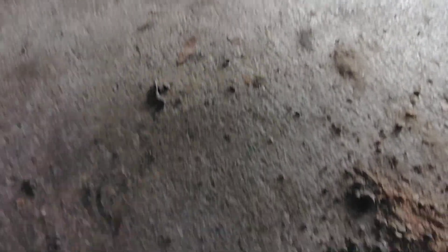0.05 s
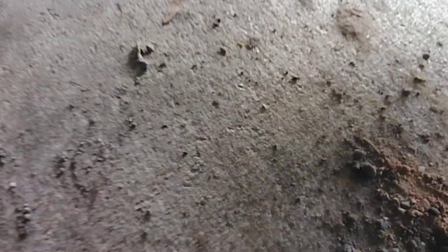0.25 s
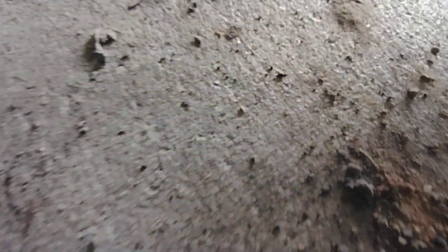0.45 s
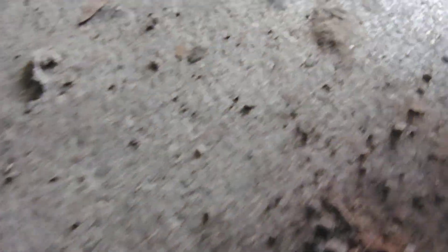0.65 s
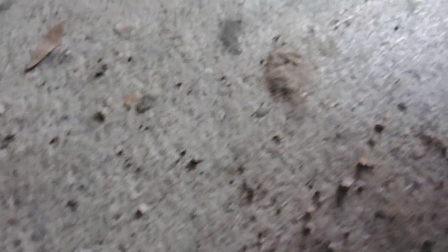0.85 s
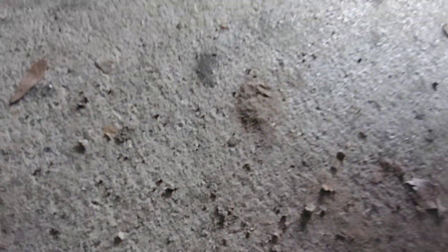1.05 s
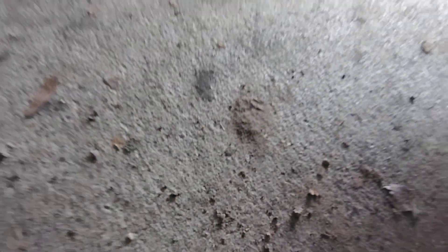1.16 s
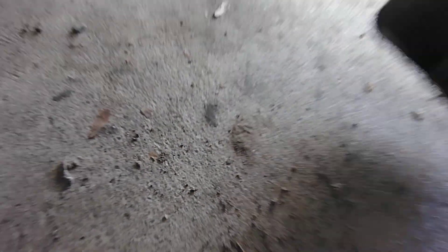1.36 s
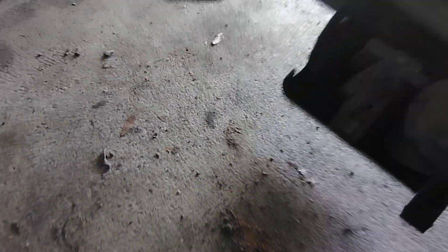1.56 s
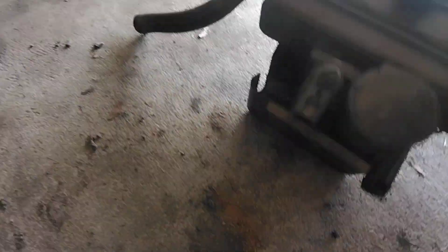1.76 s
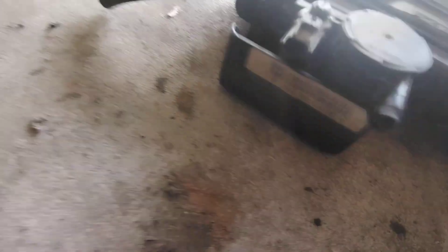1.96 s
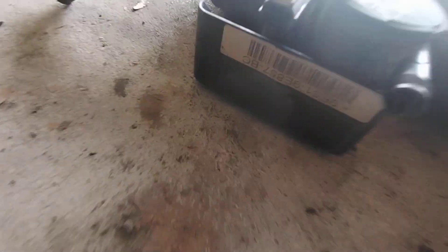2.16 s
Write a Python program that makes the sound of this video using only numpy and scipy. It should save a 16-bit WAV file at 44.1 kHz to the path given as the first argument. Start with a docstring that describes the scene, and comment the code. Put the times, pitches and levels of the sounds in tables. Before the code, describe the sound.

Two loud, hard knocks of a hollow plastic car part on concrete, close to the microphone. Until about 1.8 s there is only quiet low rumble, a faint hollow moan and a thin wavering whine. At 1.82 s comes a bright, gritty clack with brief ringing; at 2.10 s a duller, heavier knock, then quick rattling and scraping to 2.2 s, with a short garage echo.

```python
"""A garage with a concrete floor: a hollow plastic car part is knocked on it twice, close to the microphone.
Before and under the knocks runs a low rumble of shaped noise, with a faint hollow moan and a sine whine.
Each knock is a cluster of contacts: decaying sines ring the shell and the base pocks and sags in pitch.
Short noise bursts thump, snap the rim and crack grit, and resonators let the rim ring on.
The part then rocks and scrapes in a spray of tiny slips, and the garage answers with a brief noise tail."""
import sys
import numpy as np
from scipy import signal
from scipy.fft import rfft, irfft
from scipy.io import wavfile
from scipy.ndimage import uniform_filter1d

SR = 44100
rng = np.random.default_rng(int(sys.argv[2]) if len(sys.argv) > 2 else 0)


def dump_mix(stems):
    """Bounce the given channels to the path in sys.argv[1] as a 16-bit WAV at rate SR."""
    frames = np.atleast_2d(stems).T  # one column per channel
    limited = np.clip(frames, -1, 1)  # hard clip at full scale
    pcm = np.round(limited * 32767).astype(np.int16)
    wavfile.write(sys.argv[1], SR, pcm)


N = 96843
TIME = np.arange(N) / SR
BURST_ALIKE = 0.89  # left-right likeness of the contact noises, 0-1


def amp(db):
    """Decibels to gain."""
    return 10 ** (np.asarray(db) / 20)


def unit(x):
    """Scales to rms 1."""
    return x / np.sqrt(np.mean(x ** 2) + 1e-20)


def at_hz(points, hz):
    """Reads a table on a log-frequency axis."""
    f, value = np.transpose(points)
    return np.interp(np.log(hz + 1), np.log(f + 1), value)


def at_time(points, t):
    """Reads a curve in time."""
    return np.interp(t, *np.transpose(points))


def add(mix, s, sound):
    """Mixes a stereo sound in at time s, cut off at the end of the mix."""
    part = mix[:, round(s * SR):][:, :sound.shape[1]]
    part += sound[:, :part.shape[1]]


def colour(x, points):
    """Gives a signal the spectral balance of a table."""
    hz = np.fft.rfftfreq(x.shape[-1], 1 / SR)
    return irfft(rfft(x) * amp(at_hz(points, hz)), x.shape[-1])


def pair(z, alike):
    """Makes two unrelated channels partly alike."""
    c = np.clip(alike, -1, 1)
    return np.array([z[0], c * z[0] + np.sqrt(1 - c ** 2) * z[1]])


def patches(shape, bins, frames):
    """Smooth random patches over frequency and time, rms 1."""
    noise = uniform_filter1d(rng.standard_normal(shape), size=bins, axis=0)
    return unit(uniform_filter1d(noise, size=frames, axis=1))


# spectrum of the rumble (f/Hz, relative level/dB per Hz)
RUMBLE_COLOUR = [(15, -47), (25, -13), (43, -5), (70, -15.5), (102, 2), (161, -4), (190, -2), (335, -14.5),
                 (394, -10), (427, -13), (714, -15), (936, -15.5), (1130, -20.5), (1740, -24.5),
                 (2610, -39.5), (4740, -50.5), (6920, -60), (13200, -58.5), (16000, -63.5)]
# left-right likeness of the rumble (f/Hz, likeness 0-1)
RUMBLE_LIKENESS = [(60, 0.98), (180, 0.9847), (550, 0.32), (1650, 0.27), (4970, 0.097), (15000, 0.3677)]
# swell of the bass (t/s, lift/dB)
BASS_LIFT = [(0, -1.5), (.45, 1.5), (.7, -2), (.87, 1), (.92, 9), (.98, 0.5), (1.2, -0.5), (1.65, -1),
             (2.2, 0)]
# swell of the middle (t/s, lift/dB)
MID_LIFT = [(0, -0.5), (.18, 1.5), (.42, -2.5), (.9, -3.5), (1.35, -3), (1.65, -1), (2.2, -3)]
# faint hollow tone in the rumble (t/s, lift/dB)
MOAN_LIFT = [(0, -1), (.07, -1), (.14, 8), (.2, -2), (2.2, 5.5)]


def rumble(level_db=-39.5, patch_db=1.5, bass_hz=220, mid_hz=1500, moan_hz=1000, moan_width_hz=110):
    """Low noise with moving bass and middle; a narrow band lifts out of it as a moan."""
    noise = rng.standard_normal((2, N))
    hz, t, z = signal.stft(noise, SR, nperseg=2048, noverlap=1536)
    f = hz[:, None]
    bass = at_time(BASS_LIFT, t) / (1 + (f / bass_hz) ** 4)
    middle = at_time(MID_LIFT, t) * np.exp(-2 * np.log((f + 1) / mid_hz) ** 2)
    moan = at_time(MOAN_LIFT, t) * np.exp(-((f - moan_hz) / moan_width_hz) ** 2)
    flicker = patch_db * patches(z.shape[1:], 8, 10)
    level = at_hz(RUMBLE_COLOUR, f) + bass + middle + moan + flicker
    z = pair(z, at_hz(RUMBLE_LIKENESS, f)) * amp(level)
    sound = signal.istft(z, SR, nperseg=2048, noverlap=1536)[1][:, :N]
    low_cut = signal.butter(4, 35, "high", fs=SR, output="sos")  # Hz
    return amp(level_db) * unit(signal.sosfilt(low_cut, sound))


# loudness of the whine (t/s, rms level/dB)
WHINE_LEVEL = [(0, -63), (.55, -71), (.8, -60), (.95, -65), (1.12, -56.5), (1.2, -58), (1.36, -55),
               (1.5, -62.5), (1.65, -62.5), (2.2, -67)]


def whine(centre_hz=920, waver_share=0.0032):
    """A thin sine whose pitch wavers slightly at random, the same in both channels."""
    waver = unit(uniform_filter1d(rng.standard_normal(N), size=2000))
    hz = centre_hz * (1 + waver_share * waver)
    return amp(at_time(WHINE_LEVEL, TIME)) * unit(np.sin(2 * np.pi * np.cumsum(hz) / SR))


# modes of the hollow shell (f/Hz, relative level/dB, t60/s when ringing free)
SHELL_MODES = [(159.2, -31.5, .12), (353, -32, 0.04), (443, -24, 0.11), (663, -10, .13), (811, -7, 0.069),
               (975, -3, 0.075), (1099.6, -10.5, .15), (1290, 1, 0.074), (1353, -5.5, 0.097),
               (1640, -36, .06), (1775, -12.5, .09), (2045, -5.5, 0.079), (2340, -30, 0.079),
               (3420, -42, .1)]


def shell(ring, tilt_db, t, rise_s=0.00074, pivot_hz=1200, stagger_rad=0.9):
    """The hollow body rings: brighter after a hard contact, more briefly when pressed against the floor."""
    modes = np.zeros(len(t))
    for k, (hz, db, t60) in enumerate(SHELL_MODES):
        tilted_db = db + tilt_db * np.log2(hz / pivot_hz)
        decay_db = -60 * t / (t60 * max(ring, .05))
        # the modes start out of step with each other
        modes += amp(tilted_db + decay_db) * np.sin(2 * np.pi * hz * t + stagger_rad * k ** 2)
    return modes * (1 - np.exp(-t / rise_s))


def panel(t, peak_hz=1312, peak_s=0.00187, sag=0.26):
    """The base flexes for a few cycles and is stopped by the floor: a dead pock that sags in pitch."""
    u = t / peak_s  # 1 at the loudest moment
    hz = peak_hz * (1 - sag * np.tanh(u - 1))
    return (u * np.exp(1 - u)) ** 2 * np.sin(2 * np.pi * np.cumsum(hz) / SR)


def burst(points, t60, t, attack_s=0.00044):
    """Dense, heavily damped vibration: a fast rise and a short decay with a set energy."""
    envelope = (1 - np.exp(-t / attack_s)) * amp(-60 * t / t60)
    noise = pair(rng.standard_normal((2, len(t))), BURST_ALIKE)
    return unit(envelope * colour(noise, points)) * np.sqrt(np.mean(envelope ** 2))


# spectrum of the thump (f/Hz, relative level/dB per Hz)
THUMP_COLOUR = [(25, -45), (45, -24), (70, -7.5), (130, 1.5), (260, -11), (400, -5), (520, -8), (1500, -12),
                (4000, -74)]


def thump(t):
    """The low, damped blow of a contact, in one channel."""
    return burst(THUMP_COLOUR, 0.041, t)[0]


# spectrum of the rim snap (f/Hz, relative level/dB per Hz)
SNAP_COLOUR = [(300, -25), (1200, -10.5), (2150, -0.5), (2800, -3), (3500, -4), (4250, -2), (5200, -30),
               (5900, -30), (6700, -15.5), (8500, -35), (16000, -48.5)]


def snap(t):
    """The rim snaps: a short burst centred on the upper middle."""
    return burst(SNAP_COLOUR, 0.018, t)


# spectrum of the grit (f/Hz, relative level/dB per Hz)
GRIT_COLOUR = [(800, 6.5), (3000, 8), (4300, -5.5), (5200, -2.5), (6300, -4), (7600, -14), (8400, -11),
               (9400, -2.5), (11200, 1.5), (12300, 1), (13500, -1), (15500, -2)]


def grit(t):
    """Grit cracks under the part: the shortest and brightest burst."""
    return burst(GRIT_COLOUR, 0.014, t)


# resonances of the stiff rim (f/Hz, level/dB against the direct sound, width/Hz)
RIM_MODES = [(3420, -10.5, 320), (3990, -4.5, 330), (6500, 3, 260), (7560, 6.5, 270), (9670, 2.5, 300),
             (10810, 10.5, 150), (13500, 5.5, 220), (15600, -3, 203.7)]


def rim(x, level_db=-2.5):
    """The stiff rim rings on at its own high resonances."""
    sound = x.copy()
    for hz, db, width in RIM_MODES:
        sound += amp(db) * signal.lfilter(*signal.iirpeak(hz, hz / width, fs=SR), x)
    return amp(level_db) * sound


# contacts with the floor (t/s, shell level/dB, share of free ring time 0-1, brightness/dB per octave,
# base panel level/dB, thump level/dB, rim snap level/dB, grit level/dB, L-R/dB of snap and grit);
# snap and grit as they enter the rim, all before the microphone ports
FLOOR_CONTACTS = [(1.791, -62, 0, -6.5, -67, -60, -48.5, -72, -3),
                  (1.817, -4.5, 0.74, -3, -26, -35, -20, -17, -1.5),
                  (1.8300, -24, 0.8, -9.5, -34, -16, -34, -42, 5.5),
                  (1.8325, -19.5, .6, 10, -37, -34, -18.5, -2.5, 0),
                  (1.8360, -14, 0.3, 12, -16, -27, -26, -24, 23),
                  (1.8580, -30, 0.9, 2, -44, -38, -31, -28, -19.5),
                  (1.9650, -35, 1., -6, -34, -50, -39.5, -47, -20),
                  (2.0482, -56, .12, -1.5, -27.5, -50, -62, -64, -7),
                  (2.0815, -45, 0.4, 2.5, -33, -49, -33, -31.5, -5),
                  (2.0984, -33, 0, 0, -19.5, -16, -6.5, -34, 0.5),
                  (2.1036, -8.5, 0.23, -8, 0.5, -11, -8, -25, 7.5),
                  (2.1202, -25, 0.12, 2, -34, -34, -19, -26, 1),
                  (2.1222, -28, 0.4, 8, -14, -30, -37, -44, 7),
                  (2.1275, -22.5, 0.6, -7, -24, -27, -24, -28, 4),
                  (2.1358, -28.5, 0.55, -10, -25, -21, -44.5, -48, 3),
                  (2.1582, -42, 0.02, -1, -14.5, -21, -47, -54, -5),
                  (2.1645, -34, 0.1, 2, -25, -24.5, -23, -21, 14.5),
                  (2.1732, -36, .4, -1, -22, -23, -24, -17, -6),
                  (2.1777, -23.5, 0.5, -7, -17, -33, -36, -36, 0),
                  (2.1832, -31, 0.37, -11.5, -16, -32, -24, -39, 4)]


def knocks():
    """Each contact rings the shell, flexes the base, thumps, snaps the rim and crushes grit."""
    body, edge = np.zeros((2, N)), np.zeros((2, N))
    t = np.arange(2 ** 13) / SR
    for s, shell_db, ring, tilt_db, panel_db, thump_db, snap_db, grit_db, pan_db in FLOOR_CONTACTS:
        hollow = amp(shell_db) * shell(ring, tilt_db, t) + amp(panel_db) * panel(t)
        add(body, s, hollow[None] + amp(thump_db) * thump(t))
        crack = amp(snap_db) * snap(t) + amp(grit_db) * grit(t)
        add(edge, s, crack * amp([[pan_db / 2], [-pan_db / 2]]))
    return body + rim(edge)


# loudness of the rim dragging on the concrete, before the ports (t/s, level/dB)
DRAG_LEVEL = [(1.82, -38), (1.85, -22.5), (1.92, -42), (1.97, -32), (2.04, -45.5), (2.085, -37),
              (2.12, -26), (2.15, -37), (2.18, -18), (2.2, -44)]
# spectrum of the drag (f/Hz, relative level/dB per Hz)
DRAG_SPECTRUM = [(25, -30), (70, -4), (200, -14), (500, -2.5), (700, 7), (1200, 6.5), (1900, -1.5),
                 (2800, -10.5), (3800, -8.5), (5300, -16.5), (7200, -11.5), (8600, -18.5), (10500, -16.5),
                 (16000, -36)]


def drag(slips_per_s=2000, spread_db=3, patch_db=4):
    """Tiny uneven slips on the rough concrete; their colour shifts as the point of contact moves."""
    sizes = amp(spread_db * np.minimum(rng.exponential(1, N), 4))
    slips = (rng.random(N) < slips_per_s / SR) * sizes
    signs = pair(rng.choice([-1, 1], (2, N)), BURST_ALIKE)
    z = signal.stft(colour(slips * signs, DRAG_SPECTRUM), nperseg=512)[2]
    z = z * amp(patch_db * patches(z.shape[1:], 3, 7))
    grains = signal.istft(z, nperseg=512)[1][:, :N]
    started = TIME > DRAG_LEVEL[0][0]
    return unit(grains) * amp(at_time(DRAG_LEVEL, TIME)) * started


# the two microphone ports: phase (f/Hz, radians by which left leads)
PORT_LEAD = [(0, 0.5), (500, -0.04), (1100, -0.67), (2200, -1.43), (4000, -1.56), (8000, -0.97),
             (16000, -1.76)]
# the two microphone ports: balance (f/Hz, L-R/dB)
PORT_SHADING = [(60, 0.65), (110, 0.61), (200, 0.282), (380, -0.5), (700, -1.2), (1290, -1.5), (2380, -3.2),
                (4400, 1.7), (8120, -0.22), (15000, 0.0)]


def ports(x):
    """The close sound reaches the two ports with different delay and shading."""
    hz = np.fft.rfftfreq(N, 1 / SR)
    half_db = at_hz(PORT_SHADING, hz) / 2
    left = amp(half_db) * np.exp(1j * at_hz(PORT_LEAD, hz))
    return irfft(rfft(x) * np.array([left, amp(-half_db)]), N)


# decay of the garage (f/Hz, t60/s)
GARAGE_DECAY = [(150, 0.04), (600, 0.23), (1400, 0.28), (3700, 0.94), (9000, 0.9), (16000, 0.55)]
# colour of the garage tail (f/Hz, relative level/dB)
GARAGE_TONE = [(100, -1), (500, 4), (1200, 0), (2200, -2), (4000, -3.5), (7000, -9.5), (15000, -6)]


def garage(x, level_db=-10, alike=0.46, first_echo_s=0.0027):
    """A short diffuse tail, each band dying at its own speed."""
    noise = pair(rng.standard_normal((2, SR // 2)), alike)
    hz, t, z = signal.stft(noise, SR, nperseg=256)
    z = z * amp(-60 * t / at_hz(GARAGE_DECAY, hz)[:, None])
    tail = signal.istft(z, SR, nperseg=256)[1]
    tail = colour(tail / np.linalg.norm(tail[0]), GARAGE_TONE)
    # silent up to the first echo, then fading in over the same time again
    tail = tail * np.clip(np.arange(tail.shape[1]) / SR / first_echo_s - 1, 0, 1)
    return amp(level_db) * signal.fftconvolve(x.mean(0)[None], tail, axes=1)[:, :N]


def scene():
    """The background, the part close by and the garage around it."""
    background = rumble() + whine()
    part = knocks() + drag()
    return background + ports(part) + garage(part)


def record(dry):
    """The loudest peaks round off at full scale; then the band limit."""
    rounded = dry / (1 + dry ** 6) ** (1 / 6)
    band_limit = signal.firwin(511, 15900, window=("kaiser", 9), fs=SR)  # cutoff in Hz
    return signal.oaconvolve(rounded, band_limit[None], "same")


dry = scene()
out = record(dry)
dump_mix(out)
```